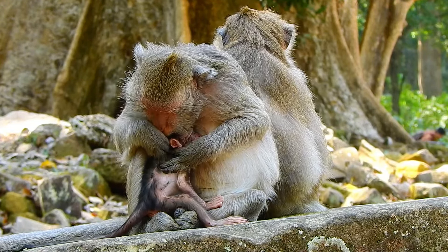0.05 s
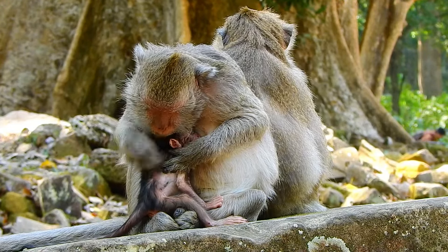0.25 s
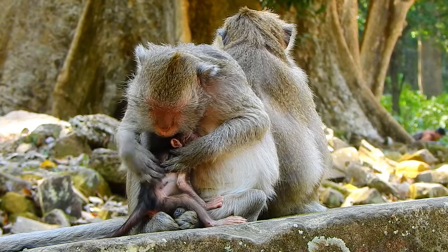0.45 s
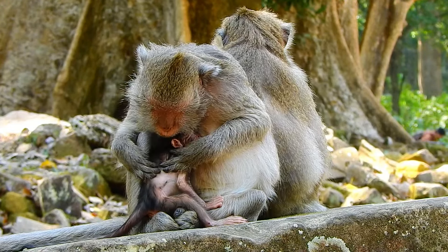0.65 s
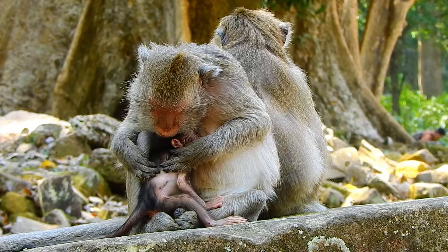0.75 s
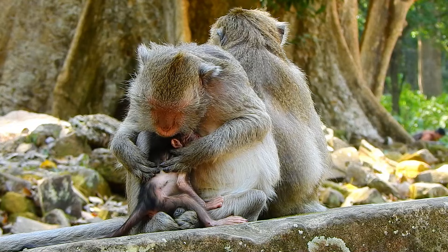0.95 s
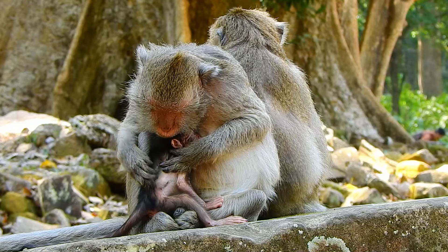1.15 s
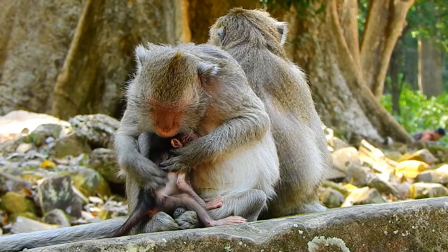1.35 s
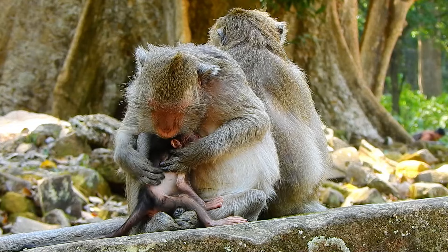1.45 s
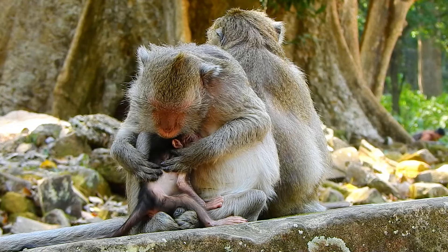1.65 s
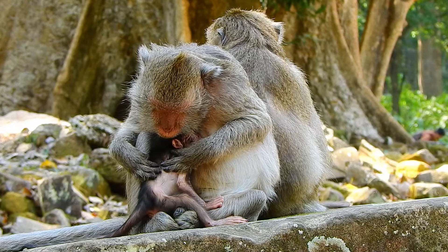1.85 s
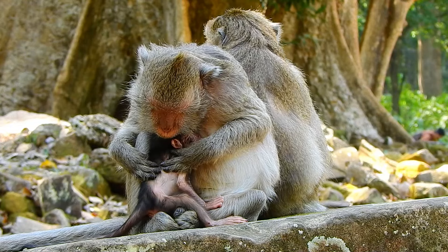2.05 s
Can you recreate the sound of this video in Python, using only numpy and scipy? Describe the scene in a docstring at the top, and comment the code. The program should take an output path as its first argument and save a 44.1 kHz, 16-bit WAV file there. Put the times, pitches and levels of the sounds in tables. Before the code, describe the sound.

Short wet mouth clicks from huddled monkeys, one sharp cluster then softer ones, with brief dry rustling

```python
"""On a stone ledge under trees, huddled macaques make short, wet, chirping smacks with their mouths.
Each smack is a click ringing two mouth resonances, followed by a ledge echo and close scatter.
Brief scratchy rustles, as of fur and dry leaves, are trains of random grains shaped in spectrum.
A faint high tone, noise modulated onto a gliding carrier, mostly sinks; filtered noise gives low bumps.
Smacks and rustles leave a short diffuse tail of decaying noise; shaped noise is the very still air."""
import sys
import numpy as np
from scipy import signal
from scipy.fft import rfft, irfft
from scipy.io import wavfile

SR = 44100
rng = np.random.default_rng(int(sys.argv[2]) if len(sys.argv) > 2 else 0)


def transcribe(u):
    """Save the signal u as a 16-bit wav file named by the first command-line argument.

    u: samples, shape (n,) or (channels, n), limited to [-1, 1]; the rate is SR.
    q: integer samples, one column per channel.
    """
    v = np.clip(np.atleast_2d(u).T, -1, 1)
    q = np.round(v * 32767).astype(np.int16)
    wavfile.write(sys.argv[1], SR, q)


N = 92610
TIME = np.arange(N) / SR

LOWER_WIDTH_HZ, MOUTH_LOW_HZ = 513, 1090
EDGE_HZ, EDGE_DB = 9700, -12.5   # sharp onset of the click, before softening

# Lip smacks, often in quick pairs. Each row: start in seconds, level in dB before softening,
# upper resonance in Hz, its width per pass in Hz, lower resonance in dB relative to the upper,
# lower resonance in Hz, softness as a cut-off in Hz, left-over-right level in dB, left lag in ms.
LIP_SMACKS = [ (0.0223, -33.5, 2900, 1100, -9, 1890, 3800, 4.5, -.115),
              (0.2057, -11, 3110, 620, -21.5, 1436, 5800, -5, .115),
              (0.2139, -14.5, 3310, 720, -30.5, 1555, 9500, 5, .115),
              (0.2158, -15, 3140, 600, -26.5, 1450, 4200, -2.5, .115),
              (0.336, -27, 3130, 520, -16.5, 1426, 4550, -3.5, .115),
              (0.3414, -30, 3100, 420, -20, 1400, 4200, 1, .115),
              (.6494, -37, 3440, 480, -6, 1456, 3700, -9, .115),
              (.7640, -22.5, 2860, 950, -35, 1185, 3600, -4.5, -.115),
              (.7678, -29.5, 2800, 650, -3.5, 1250, 3500, 9, -.115),
              (0.7765, -37.5, 2980, 900, -4, 1530, 6000, -6, -.115),
              (.8835, -36.5, 3050, 600, -14.5, 1380, 4000, 1, .115),
              (1.053, -54, 2890, 220, -16, 1200, 3300, -11, .115),
              (1.133, -46, 2390, 800, -8.5, 1370, 3800, -9.5, .09),
              (1.143, -42, 3430, 700, -7, 1390, 4200, -6, .09),
              (1.228, -35, 4100, 1100, -41, 1400, 5500, -6.5, .07),
              (1.343, -40.5, 3390, 800, -14, 1430, 5500, -22.5, .09),
              (1.4860, -41.5, 3490, 900, -4.5, 1224, 5060, -7.5, .115),
              (1.6047, -48, 3464, 400, -0.5, 1093, 3800, 8.5, -.115),
              (1.7144, -67.5, 3000, 700, 14.5, 1310, 3200, 14.5, -.09),
              (1.7222, -55, 3130, 600, 7, 1216, 3200, 8.5, -.09),
              (1.8270, -41.5, 3210, 380, -20, 1460, 3500, 5.5, -.115),
              (1.8481, -46.5, 3200, 500, 2, 1880, 3700, 3.5, -.115),
              (1.9256, -25, 3510, 1000, -31, 1280, 4300, -7, .09), ]


def smacks():
    """Source and filter: parting lips click and ring two mouth resonances, reaching one ear first."""
    out = np.zeros((2, N + SR))
    click = signal.unit_impulse(2048)
    edge = from_db(EDGE_DB) * peak_one(cut(click, EDGE_HZ, "high", order=2))
    for s, db, upper_hz, width_hz, lower_db, lower_hz, soft_hz, pan_db, lag_ms in LIP_SMACKS:
        upper = peak_one(resonate(click, upper_hz, width_hz))
        lower = peak_one(resonate(click, lower_hz, LOWER_WIDTH_HZ))
        ringing = upper + from_db(lower_db) * lower + edge
        softened = cut(ringing, soft_hz, "low", order=3)
        smack = from_db(db) * cut(softened, MOUTH_LOW_HZ, "high")
        half_lag_s = lag_ms / 2000
        for ear, delay_s in enumerate((half_lag_s, -half_lag_s)):
            start = int(s * SR) + int(np.floor(delay_s * SR))
            out[ear, start:start + len(smack)] += pan(pan_db)[ear] * smack
    return out[:, :N]


LEDGE_ECHO_S, LEDGE_ECHO_DB = 0.003078, -9.5


def ledge(x):
    """Specular reflection: the stone ledge returns one close, slightly dull echo."""
    delayed = np.pad(x, ((0, 0), (int(LEDGE_ECHO_S * SR), 0)))[:, :N]
    return x + from_db(LEDGE_ECHO_DB) * cut(delayed, 5000, "low", order=2)


SCATTER_T60_S = 0.075


def scatter(x):
    """Scattering: bodies and ledge smear sound over tens of milliseconds, alike in both ears."""
    t = TIME[:SR // 10]
    decay = from_db(-60 * t / SCATTER_T60_S)
    response = rng.standard_normal(len(t)) * decay * (t > .001)
    return signal.fftconvolve(x, response[None] / np.linalg.norm(response), axes=1)[:, :N]


GRAINS_PER_S, GRAIN_SPREAD_DB = 3000, 3.5
BASS_HZ, TREBLE_HZ = 1620, 4350   # where half of a stroke's bass or treble dB applies

# Spectrum shared by all rustles. Each row: frequency in Hz, gain in dB.
GRAIN_SPECTRUM = [(80, -49), (160, -37), (280, -34.5), (400, -31.5), (700, -20.5), (1200, -10.5),
                  (1900, -7.5), (2500, -1), (3200, 2.5), (3800, -2), (4600, -17.5), (6000, -29.5),
                  (8000, -51), (11000, -66.5)]
# Strokes of fur and leaf. Each row: peak in seconds, rise and fall in seconds per 20 dB,
# level in dB, left-over-right level in dB, bass tilt in dB, treble tilt in dB.
FUR_STROKES = [ (0.035, 0.045, 0.083, -50, 2, 4.5, 2), (0.341, 0.0078, 0.048, -43.5, -2, -11, 6),
               (0.543, 0.13, 0.17, -66, 0.5, 11, 1), (0.706, 0.07, 0.17, -50.5, 0, 11.5, 3),
               (0.769, 0.012, 0.039, -41, 4, 10.5, -0.5), (0.885, .010, 0.043, -51, -3.5, 3, 6.5),
               (1.01, 0.051, 0.099, -71.5, 3.5, 20.5, -20), (1.10, .03, .06, -72.5, -1.5, -5, 23),
               (1.164, 0.037, 0.11, -46.5, -9, -3, 5.5), (1.238, 0.034, 0.077, -55, -5.5, 5.5, 15),
               (1.383, 0.048, 0.078, -33.5, -3.5, 7, 4), (1.491, 0.0065, 0.053, -52.5, -2, 13.5, 9),
               (1.614, 0.031, 0.092, -58.5, 5, 16.5, 1), (1.728, 0.027, 0.072, -66.5, 11.5, 23.5, -30),
               (1.846, 0.021, 0.067, -53.5, 5, 3.5, -0.5), (1.948, 0.037, 0.16, -53.5, -2.5, -3.5, 4),
               (2.028, 0.12, 0.47, -60, 5, 5, 8.5), ]


def rustles():
    """Friction as shot noise: dense tiny catches swell and fade, each stroke with its own brightness."""
    out = 0
    hz = np.fft.rfftfreq(N, 1 / SR)
    bass = 1 / (1 + (hz / BASS_HZ) ** 4)
    treble = 1 - 1 / (1 + (hz / TREBLE_HZ) ** 8)
    for s, rise_s, fall_s, db, pan_db, bass_db, treble_db in FUR_STROKES:
        spread = np.minimum(rng.exponential(1, (2, N)), 4)
        sizes = from_db(GRAIN_SPREAD_DB * spread) * rng.choice([-1, 1], (2, N))
        grains = sizes * (rng.random((2, N)) < GRAINS_PER_S / SR)
        colour = from_db(at_hz(GRAIN_SPECTRUM, hz) + bass_db * bass + treble_db * treble)
        scratch = rms_one(irfft(rfft(grains) * colour, N))
        out = out + scratch * from_db(db) * pan(pan_db) * swell(s, rise_s, fall_s)
    return out


TONE_WIDTH_HZ, RASP_WIDTH_HZ = 440, 1230

# Thin tone in a wider rasp. Each row: time in seconds, frequency in Hz, tone in dB, rasp in dB.
GLIDING_TONE = [(0.216, 3300, -67, -58), (.24, 3200, -58, -45.5), (0.312, 3200, -58, -53),
                (.39, 3100, -58, -52), (.47, 2850, -76, -61), (0.561, 2450, -68, -76.5),
                (0.631, 3200, -82, -63.5), (0.752, 3300, -58.5, -67.5), (0.799, 3200, -55.5, -55.5),
                (0.931, 3100, -57.5, -71.5), (1.029, 2900, -70.5, -81.5), (1.062, 2950, -65.5, -78.5),
                (1.109, 3100, -72, -70), (1.165, 3248, -51.5, -49.5), (1.25, 3447, -75, -74)]


def thin_tone():
    """Narrow-band noise: slow random wavers modulate a gliding carrier, as a tone in a raspy halo."""
    s, hz, tone_db, rasp_db = np.transpose(GLIDING_TONE)
    phase = 2 * np.pi * np.cumsum(np.interp(TIME, s, hz)) / SR
    out = 0
    for width_hz, db in ((TONE_WIDTH_HZ, tone_db), (RASP_WIDTH_HZ, rasp_db)):
        waver = cut(rng.standard_normal((2, 2, N)), width_hz / 2, "low", order=3)
        band = waver[0] * np.cos(phase) + waver[1] * np.sin(phase)
        level_db = np.interp(TIME, s, db, left=-np.inf, right=-np.inf)   # silent outside the table
        out = out + rms_one(band) * from_db(level_db)
    return out


BUMP_WIDTH_HZ = 63   # per pass of the resonance

# Soft low bumps of moving bodies. Each row: peak in seconds, rise and fall in seconds per 20 dB,
# level in dB, resonance in Hz.
BODY_BUMPS = [(0.041, 0.032, 0.23, -79, 70), (0.771, .012, 0.046, -66, 257), (0.796, 0.056, 0.052, -70, 65),
              (1.41, 0.055, 0.11, -73.5, 85), (1.519, 0.025, 0.036, -65.5, 80),
              (1.66, 0.098, 0.26, -84.5, 85)]


def bumps():
    """Resonance excited by noise: dull low thuds as the animals shift, equal in both ears."""
    out = 0
    for s, rise_s, fall_s, db, hz in BODY_BUMPS:
        thud = rms_one(resonate(rng.standard_normal(N), hz, BUMP_WIDTH_HZ))
        out = out + from_db(db) * swell(s, rise_s, fall_s) * thud
    return out


# Tail of the surroundings. Each row: frequency in Hz, 60 dB decay time in seconds, gain in dB.
DIFFUSE_TAIL = [(300, 0.53, -0.5), (1350, 0.59, -6), (2130, 0.21, 6), (3150, 0.14, -16), (5000, 0.3, -1),
                (9100, 0.56, -8)]


def surroundings(x):
    """Diffuse reverberation: trunks and stones reflect, dying band by band, unrelated in each ear."""
    edges = 200 * 2 ** (np.arange(13) / 2)   # half octaves
    t = TIME[:SR * 3 // 4]
    white = rng.standard_normal((2, 2, len(t)))   # neighbouring bands use different noise
    response = 0
    for k, (low, high) in enumerate(zip(edges, edges[1:])):
        hz = np.sqrt(low * high)
        decay = from_db(-60 * t / at_hz(DIFFUSE_TAIL, hz))
        band_pass = signal.butter(2, [low, high], "band", fs=SR, output="sos")
        band = signal.sosfilt(band_pass, white[k % 2] * decay)
        response = response + band * from_db(at_hz(DIFFUSE_TAIL, hz, axis=2)) / np.linalg.norm(decay)
    return signal.fftconvolve(x, response, axes=1)[:, :N]


AIR_DB = -80
AIR_LIKENESS = 0.64   # correlation between the ears

# Spectrum of the still air. Each row: frequency in Hz, gain in dB.
AIR_SPECTRUM = [(15, -25.5), (25, 0), (64, -2.5), (100, -11), (145, -21.5), (280, -11.5), (400, -16),
                (1200, -12), (3100, -14.5), (4400, -23), (6600, -33), (11000, -34.5), (14000, -65.5)]


def air():
    """Partly coherent noise: very quiet outdoor rumble and hiss, partly alike in both ears."""
    colour = from_db(at_hz(AIR_SPECTRUM, np.fft.rfftfreq(N, 1 / SR)))
    mid, side = irfft(rfft(rng.standard_normal((2, N))) * colour, N)
    shared = np.sqrt(1 + AIR_LIKENESS) * mid
    opposed = np.sqrt(1 - AIR_LIKENESS) * side * [[1], [-1]]
    return from_db(AIR_DB) * rms_one(shared + opposed)


RISE_CURVE = 1.93


def swell(peak_s, rise_s, fall_s):
    """Exponential decay after a rounded climb, each spanning 20 dB in its given time."""
    climb = (np.maximum(peak_s - TIME, 0) / rise_s) ** RISE_CURVE
    fall = (TIME - peak_s) / fall_s
    return from_db(-20 * np.minimum(np.maximum(climb, fall), 10))


def resonate(x, hz, width_hz):
    """Damped resonance: a two-pole ring applied twice, for steep skirts."""
    r = np.exp(-np.pi * width_hz / SR)
    b = (1 - r * r) / 2 * np.array([1, 0, -1])
    a = [1, -2 * r * np.cos(2 * np.pi * hz / SR), r * r]
    once = signal.lfilter(b, a, x + 1e-18)
    return signal.lfilter(b, a, once)


def cut(x, hz, kind, order=4):
    """Butterworth filtering: a low- or high-pass with a flat pass band."""
    return signal.sosfilt(signal.butter(order, min(hz, .45 * SR), kind, fs=SR, output="sos"), x)


def pan(db):
    """Interaural level difference: left and right gains, left louder when positive."""
    return from_db(np.array([[db], [-db]]) / 2)


def at_hz(points, hz, axis=1):
    """Logarithmic frequency scale: read a table column between its rows."""
    table = np.array(points)
    return np.interp(np.log(hz + 1e-9), np.log(table[:, 0]), table[:, axis])


def from_db(db):
    """Decibel law: 20 dB is a tenfold amplitude."""
    return 10 ** (np.asarray(db) / 20)


def rms_one(x):
    """Power normalisation: scale to unit rms."""
    return x / np.sqrt(np.mean(x ** 2) + 1e-20)


def peak_one(x):
    """Peak normalisation: scale to unit peak."""
    return x / np.abs(x).max()


SMACK_TAIL_DB, RUSTLE_TAIL_DB, SCATTER_DB = -3, -8, -13   # sends to the reflections


def scene():
    """Superposition: smacks and rustles with their tails, thin tone and bumps, over still air."""
    mouth = ledge(smacks())
    fur = rustles()
    tail = surroundings(from_db(SMACK_TAIL_DB) * mouth + from_db(RUSTLE_TAIL_DB) * fur)
    near = mouth + from_db(SCATTER_DB) * scatter(mouth) + fur
    return near + tail + thin_tone() + bumps() + air()


CUTOFF_HZ = 10900


def record(dry):
    """Band limiting: an elliptic low-pass cuts the top steeply."""
    return signal.sosfilt(signal.ellip(10, .2, 70, CUTOFF_HZ, fs=SR, output="sos"), dry)


dry = scene()
out = record(dry)
transcribe(out)
```